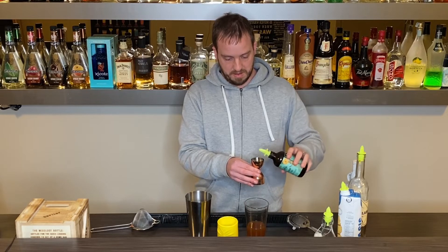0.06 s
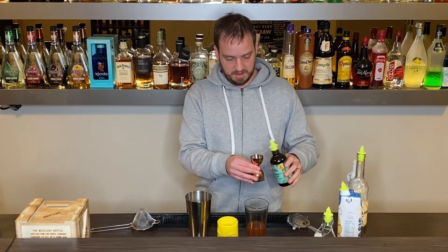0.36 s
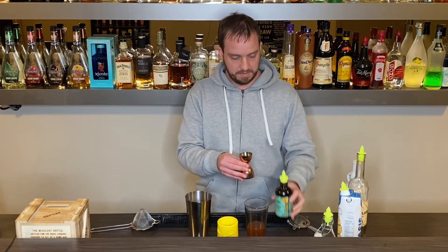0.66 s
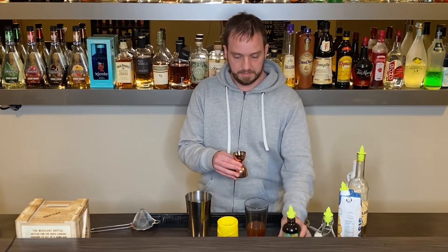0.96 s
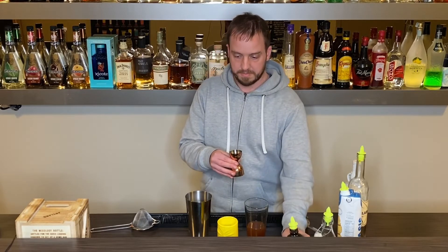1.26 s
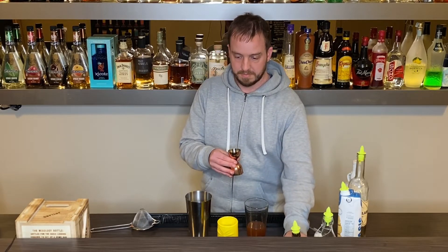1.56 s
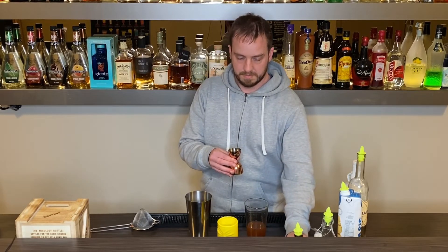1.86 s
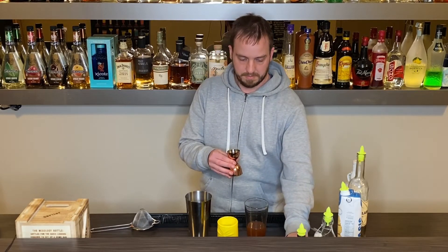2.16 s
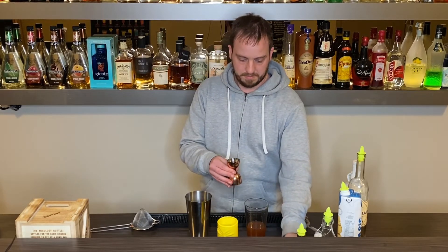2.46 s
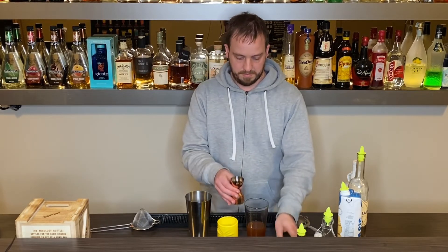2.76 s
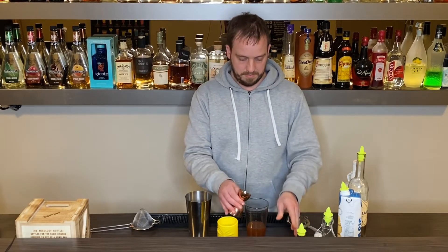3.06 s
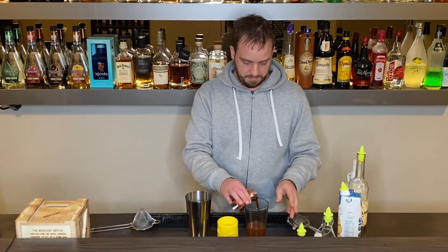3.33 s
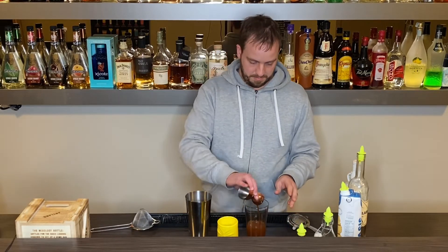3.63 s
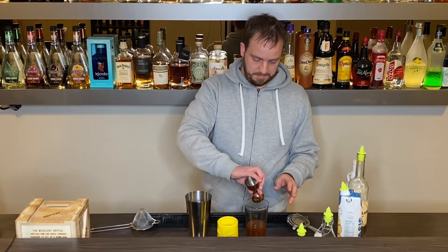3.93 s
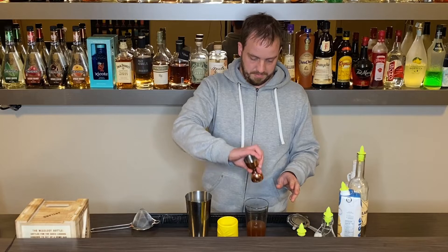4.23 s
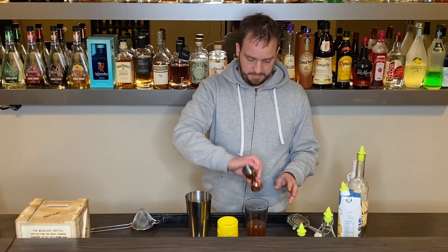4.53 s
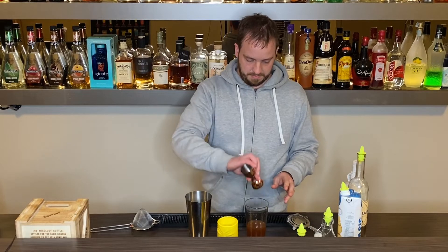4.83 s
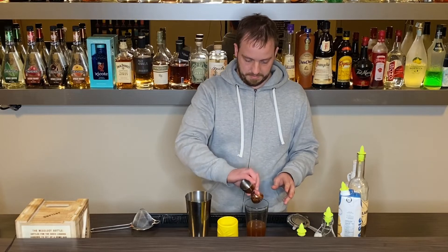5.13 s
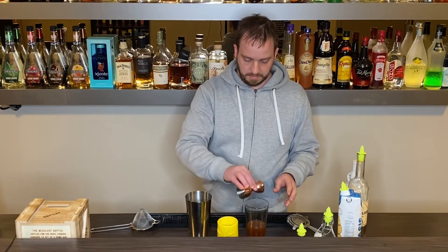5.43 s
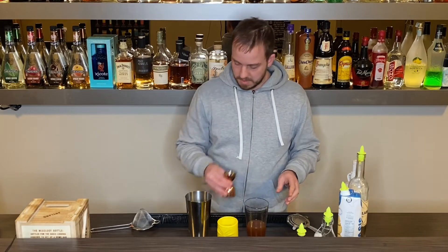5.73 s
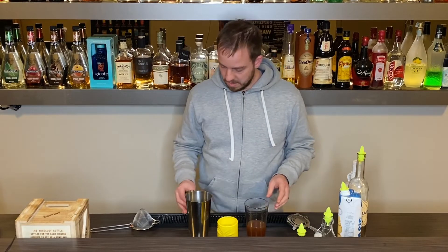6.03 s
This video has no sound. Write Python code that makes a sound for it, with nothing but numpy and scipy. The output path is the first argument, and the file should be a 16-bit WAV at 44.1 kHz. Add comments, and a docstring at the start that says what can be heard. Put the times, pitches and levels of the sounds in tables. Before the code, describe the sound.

A bottle knocks on a wooden shelf, then a steel jigger clacks down and clinks once against a glass in a quiet room.

```python
"""Small sounds at a quiet bar

One microphone near the counter of a quiet room; ventilation rumbles under its soft hiss.
A bartender stows a small bottle on the wooden shelf below, grazing its neighbour, and a sleeve brushes
past. He knocks a steel jigger on the bar mat, ticks it against a tumbler and taps the last drop out,
so the glass rings briefly. Each knock drives the modes of the thing struck, and the room answers."""
import sys
import numpy as np
from scipy import signal
from scipy.fft import rfft, irfft
from scipy.io import wavfile

SR = 44100
rng = np.random.default_rng(int(sys.argv[2]) if len(sys.argv) > 2 else 0)


def store_wav(level_fs):
    """Save 16-bit WAV to argv[1]."""
    pcm = np.round(np.clip(np.atleast_2d(level_fs), -1, 1) * 32767)
    wavfile.write(sys.argv[1], SR, pcm.T.astype(np.int16))


N = 268348
RING_TIME = np.arange(SR) / SR
HALF_OCTAVES_HZ = 80 * 2 ** (np.arange(16) / 2)


def from_db(db):
    """Decibels to gain."""
    return 10 ** (np.asarray(db) / 20)


def unit_rms(x):
    """Scale to unit power."""
    return x / np.sqrt(np.mean(x ** 2) + 1e-20)


def at_hz(rows, hz, column=1):
    """Read a column of a table on a log-frequency axis."""
    rows = np.array(rows)
    return np.interp(np.log(hz + 1e-9), np.log(rows[:, 0]), rows[:, column])


def add(track, time_s, sound):
    """Mix a sound into a track at a time."""
    start = round(time_s * SR)
    track[start:start + len(sound)] += sound[:max(N - start, 0)]


def decay(t60):
    """One second of exponential decay, falling 60 dB in t60 seconds."""
    return from_db(-60 * RING_TIME / t60)


def burst(hz, octaves, t60):
    """Dying band noise whose energy is that of its envelope."""
    edges_hz = np.minimum(hz * 2 ** (np.array([-.5, .5]) * octaves), [.44 * SR, .48 * SR])
    bandpass = signal.butter(2, edges_hz, "band", fs=SR, output="sos")
    band = signal.sosfilt(bandpass, rng.standard_normal(2 * SR))[SR:]
    envelope = decay(t60)
    return unit_rms(band * envelope) * np.sqrt(np.mean(envelope ** 2))


def coloured_noise(spectrum):
    """Steady noise with a given spectrum; rms 1."""
    hz = np.arange(N // 2 + 1) * SR / N
    white = rfft(rng.standard_normal(N))
    return unit_rms(irfft(white * from_db(at_hz(spectrum, hz)), N))


def stroke(peak_s, swell_s, fade_s):
    """Speed of a slide: 1 at its peak, 1/e at swell_s before and fade_s after."""
    t = np.arange(N) / SR - peak_s
    return np.exp(-(t / np.where(t < 0, swell_s, fade_s)) ** 2)


def struck(contacts, modes, crack):
    """Contacts drive a body with a few clear modes and a crowd of short ones, its crack."""
    force = np.zeros(N)
    impulse = signal.unit_impulse(SR // 20) + 1e-18
    for time_s, db, bright_hz, lowest_hz in contacts:
        # a soft contact lasts longer and is dull
        pole = np.exp(-2 * np.pi * bright_hz / SR)
        pulse = signal.lfilter([(1 - pole) ** 2], [1, -2 * pole, pole ** 2], impulse)
        # a blow near a support hardly moves the low modes
        pulse = signal.lfilter(*signal.butter(1, lowest_hz, "high", fs=SR), pulse)
        add(force, time_s, from_db(db) * pulse)
    clear = sum((-1) ** k * from_db(db) * np.sin(2 * np.pi * hz * RING_TIME) * decay(t60)
                for k, (hz, db, t60) in enumerate(modes))
    crowd = sum(from_db(at_hz(crack, hz)) * burst(hz, octaves=0.38, t60=at_hz(crack, hz, column=2))
                for hz in HALF_OCTAVES_HZ)
    return signal.fftconvolve(force, clear + crowd)[:N]


# the empty room at the microphone: (frequency [Hz], relative density [dB])
ROOM_TONE_SPECTRUM = [(8.8, -31.5), (15, 4), (29, -6.5), (59, -13.5), (118, -18.5), (177, -22.5),
                      (290, -25), (355, -27), (504, -32), (549, -31), (900, -35.5), (3050, -42.5),
                      (3960, -43.5), (13400, -46.5), (15500, -48.5)]


def room_tone(level_db=-55.5):
    """Ventilation rumbles steadily under the microphone's own hiss."""
    return from_db(level_db) * coloured_noise(ROOM_TONE_SPECTRUM)


# rim, fingers and bottle: (time [s], starting level [dB], centre [Hz], width [octaves])
SMALL_TICKS = [(0.715, -61, 2380, 1), (2.409, -65, 2100, 1), (3.383, -63.5, 5060, 0.22),
               (3.651, -61, 990, 0.49), (3.71, -61, 3000, 0.85), (3.718, -56.5, 12900, .5),
               (3.791, -46, 10000, 2.5), (3.7924, -54, 4440, 0.2), (3.802, -50, 11300, 0.54),
               (5.968, -61, 2000, 1), (6.067, -63, 4220, 0.19)]


def ticks():
    """Tiny contacts around the counter, damped by the hand; the broad ones die soonest."""
    out = np.zeros(N)
    for time_s, db, hz, octaves in SMALL_TICKS:
        width_hz = hz * octaves
        t60 = 0.071 * (940 / width_hz) ** 0.32
        add(out, time_s, from_db(db) * burst(hz, octaves, t60))
    return out


# bottle on wood: (time [s], strength [dB], brightness [Hz], lowest driven [Hz])
BOTTLE_KNOCKS = [(1.8168, 1.5, 3300, 60), (1.828, -4, 1000, 250), (1.908, -12, 355, 60),
                 (1.948, -10.5, 296, 90), (2.156, -18.5, 900, 200), (2.164, -6, 2290, 400),
                 (2.178, -6, 790, 450), (2.322, -18, 740, 150), (2.341, -17.5, 447, 120)]
# the board's clear modes: (frequency [Hz], gain [dB], t60 [s])
BOARD_MODES = [(80, -39, 0.6), (145, -33, 0.3), (190, -33.5, 0.4), (224, -30.5, 0.12), (280.7, -34, 0.2),
               (351.5, -26.5, 0.21), (395, -30, 0.11), (423, -46.5, 0.48), (487.3, -32, 0.089),
               (538, -35, 0.093), (570, -38, 0.1), (640, -47, 0.18), (698, -45.5, 0.13), (868, -49, 0.17),
               (1090, -65, 0.16), (1428, -47.5, 0.1)]
# its short modes: (frequency [Hz], gain per half octave [dB], t60 [s])
BOARD_CRACK = [(100, -40, 0.25), (308, -29.5, 0.16), (576, -35, 0.093), (1010, -54.5, 0.1),
               (2580, -49.5, 0.05), (4450, -65, 0.092), (9000, -52, 0.16), (15000, -58, .06)]


def bottle_on_shelf():
    """Down under the counter, the bottle knocks the wooden shelf into its low modes."""
    return struck(BOTTLE_KNOCKS, BOARD_MODES, BOARD_CRACK)


# resonances of the grazed bottles: (frequency [Hz], width [octaves], relative level [dB])
BOTTLE_RESONANCES = [(4140, .03, -6.5), (5350, 0.063, -5), (8400, .04, -12), (9050, 0.045, 1),
                     (10300, .04, -4), (13100, .05, -2)]


def bottle_graze(level_db=-66):
    """On the shelf, the bottle slides against its neighbour: friction sings in narrow resonances."""
    friction = rng.standard_normal(N)
    singing = np.zeros(N)
    for hz, octaves, db in BOTTLE_RESONANCES:
        resonator = signal.iirpeak(hz, Q=1 / (octaves * np.log(2)), fs=SR)
        singing += from_db(db) * unit_rms(signal.lfilter(*resonator, friction))
    speed = stroke(peak_s=2.332, swell_s=0.011, fade_s=0.041)
    return from_db(level_db) * speed * unit_rms(singing)


# sweeps of the arm: (fastest moment [s], level [dB])
ARM_SWEEPS = [(2.57, -69.5), (5.76, -74)]
# rubbing cotton: (frequency [Hz], relative density [dB])
COTTON_SPECTRUM = [(500, 1), (3000, -3), (8000, -2), (11000, -3.5), (13000, 1), (15500, -14)]


def sleeve():
    """Cotton slides as the arm comes up from under the counter, and again as it reaches for the shaker."""
    speed = sum(from_db(db) * stroke(peak_s, swell_s=0.19, fade_s=0.22) for peak_s, db in ARM_SWEEPS)
    return speed * coloured_noise(COTTON_SPECTRUM)


# jigger and hands on the mat: (time [s], strength [dB], brightness [Hz], lowest driven [Hz])
COUNTER_KNOCKS = [(3.4188, 6, 9000, 219), (3.4255, -4.5, 1500, 300), (3.456, -6, 1500, 300),
                  (3.512, -12, 1200, 300), (5.968, -25.5, 900, 250), (6.065, -25, 915, 250)]
# clear modes of mat and counter top: (frequency [Hz], gain [dB], t60 [s])
COUNTER_MODES = [(227, -29.5, 0.055), (278, -43.5, 0.28), (322, -36, 0.22), (351.6, -29.5, 0.093),
                 (433.4, -41, 0.14), (595, -51, 0.12), (804, -61.5, 0.31), (1282, -62.5, 0.25),
                 (1770, -72.5, 0.27), (2420, -65, 0.19)]
# their short modes: (frequency [Hz], gain per half octave [dB], t60 [s])
COUNTER_CRACK = [(100, -45.5, 0.06), (300, -44, 0.084), (693, -53, 0.2), (1950, -62, 0.063),
                 (4430, -49, 0.029), (7000, -72, 0.035), (15000, -66, .04)]


def bar_mat():
    """Up on the counter, jigger and hands thud on the mat and the top beneath it."""
    return struck(COUNTER_KNOCKS, COUNTER_MODES, COUNTER_CRACK)


# steel rattling as it lands: (time [s], strength [dB], brightness [Hz], lowest driven [Hz])
STEEL_TOUCHES = [(3.42, -3, 9000, 1000), (3.4245, 2, 12000, 1000), (3.436, -2, 15000, 4000),
                 (3.44, -1, 15000, 4000), (3.458, -17, 8000, 1000), (3.474, -7, 16000, 9000)]
# the cups' clear modes: (frequency [Hz], gain [dB], t60 [s])
STEEL_MODES = [(3666, -64, 0.19), (4950, -67, 0.097), (6600, -74, .08), (6740, -60, 0.057),
               (7200, -52, 0.055), (8400, -63, 0.082), (8540, -57, 0.051), (8800, -57, .09),
               (9530, -60, 0.056), (10360, -62, 0.19), (14200, -56, .05), (14850, -62, .12)]
# their short modes: (frequency [Hz], gain per half octave [dB], t60 [s])
STEEL_CRACK = [(1500, -60, 0.075), (3980, -59.5, 0.11), (9000, -57, 0.045), (15000, -53, 0.04)]


def jigger():
    """The jigger's thin steel cups ring as it lands on the mat, damped by the fingers."""
    return struck(STEEL_TOUCHES, STEEL_MODES, STEEL_CRACK)


GLASS_NOTE_HZ, GLASS_OVERTONE_HZ = 1771, 2704
# jigger on glass: (time [s], strength [dB], brightness [Hz], lowest driven [Hz])
TUMBLER_TAPS = [(4.7652, -0.5, 14000, 80), (4.835, -23.5, 5000, 800)]
# clear modes of tumbler and held jigger: (frequency [Hz], gain [dB], t60 [s])
TUMBLER_MODES = [(GLASS_NOTE_HZ, -56.5, 0.85), (1810, -41, 0.094), (1880, -39.5, 0.041), (2050, -39, 0.05),
                 (2000, -64, 0.2), (GLASS_OVERTONE_HZ, -54, 0.1), (3000, -63, 0.089), (3850, -50, 0.017)]
# their short modes: (frequency [Hz], gain per half octave [dB], t60 [s])
TUMBLER_CRACK = [(200, -59.5, 0.1), (700, -64, 0.063), (2000, -57, 0.048), (6000, -59.5, 0.028),
                 (15000, -58, 0.021)]


def tumbler():
    """The clink reaches the microphone directly, then off the counter top and the back wall."""
    direct = struck(TUMBLER_TAPS, TUMBLER_MODES, TUMBLER_CRACK)
    out = direct.copy()
    for delay_s, db in [(.0046, -10), (.0124, -13)]:
        add(out, delay_s, from_db(db) * direct)
    return out


# the room's reverberation: (frequency [Hz], relative density [dB], t60 [s])
ROOM_TAIL = [(101, 2.5, 0.62), (400, -3.5, 0.4), (1450, 1.5, 0.52), (4930, 0.5, 0.45), (15000, -4.5, 0.23)]


def room(x, build_s=0.0099):
    """A diffuse tail builds up over the first reflections and dies sooner in the treble."""
    tail = np.zeros(SR)
    for hz in HALF_OCTAVES_HZ:
        gain = np.sqrt(hz) * from_db(at_hz(ROOM_TAIL, hz))  # higher bands are wider
        tail += gain * burst(hz, octaves=0.52, t60=at_hz(ROOM_TAIL, hz, column=2))
    tail *= 1 - np.exp(-(RING_TIME / build_s) ** 2)
    return signal.fftconvolve(x, tail / np.sqrt(np.sum(tail ** 2)))[:N]


def scene():
    """Wood, steel and glass heard from close by, in mono, well above the room's reverberation."""
    shelf = bottle_on_shelf() + bottle_graze()
    mat = bar_mat()
    steel_and_ticks = jigger() + ticks()
    clink = tumbler()
    direct = shelf + mat + steel_and_ticks + clink
    into_room = (from_db(-12.5) * shelf + from_db(-13) * mat
                 + from_db(-11) * steel_and_ticks + from_db(-14) * clink)
    return (direct + room(into_room) + sleeve() + room_tone())[None]


def record(dry, cutoff_hz=15800):
    """A steep low-pass cuts the top of the microphone's signal."""
    return signal.sosfilt(signal.ellip(12, .1, 70, cutoff_hz, fs=SR, output="sos"), dry)


dry = scene()
out = record(dry)
store_wav(out)
```